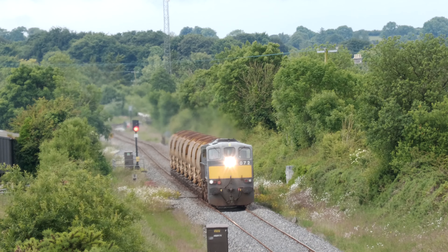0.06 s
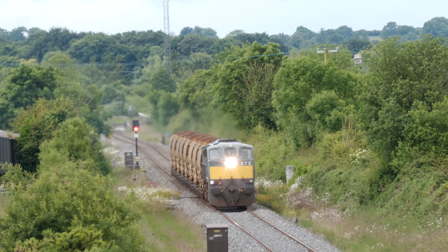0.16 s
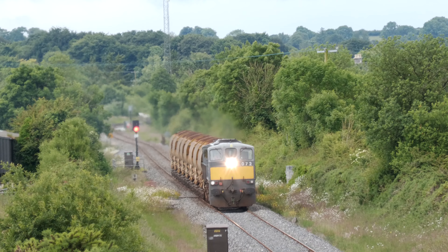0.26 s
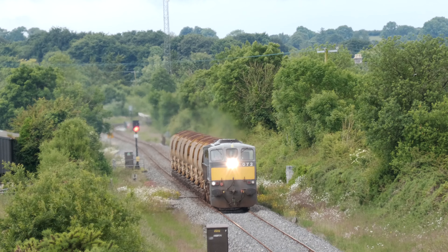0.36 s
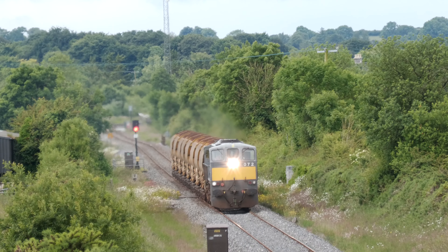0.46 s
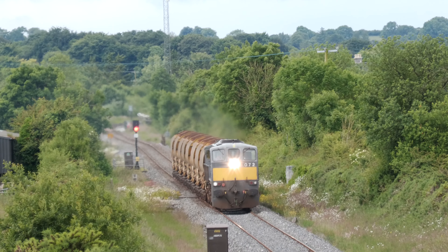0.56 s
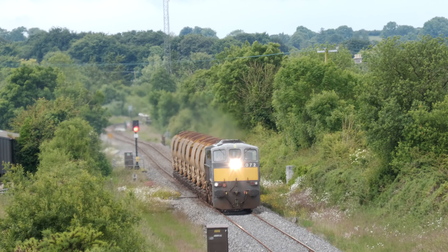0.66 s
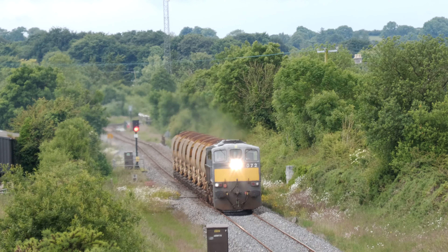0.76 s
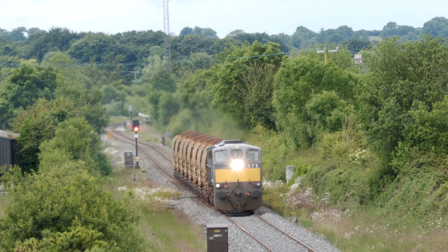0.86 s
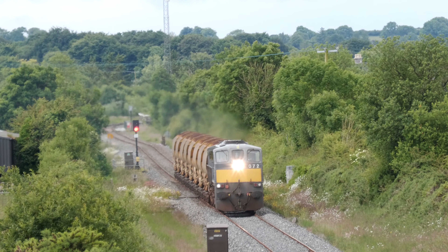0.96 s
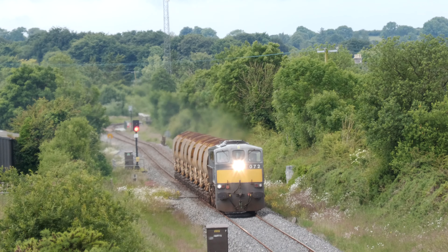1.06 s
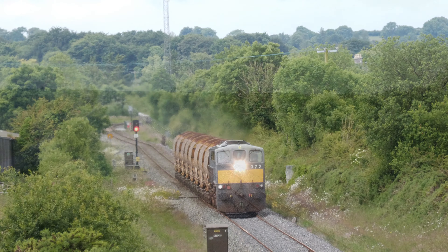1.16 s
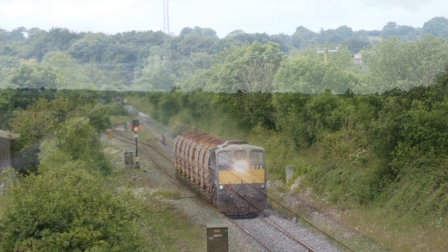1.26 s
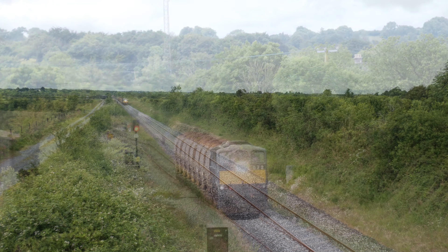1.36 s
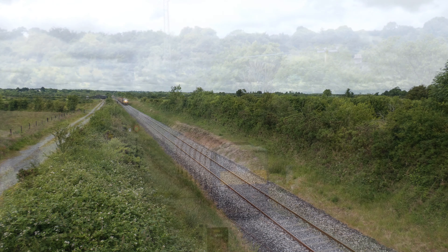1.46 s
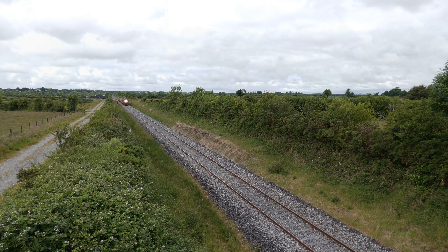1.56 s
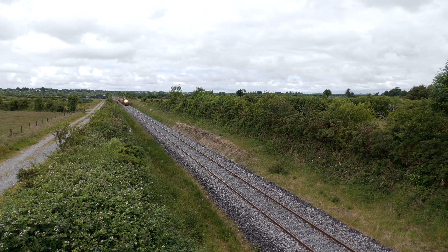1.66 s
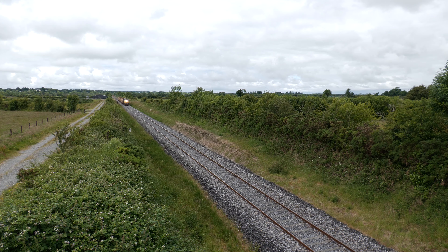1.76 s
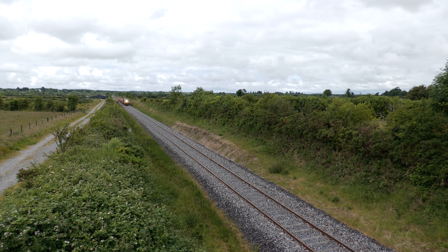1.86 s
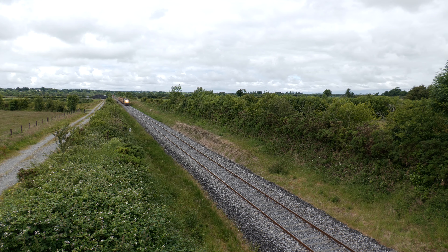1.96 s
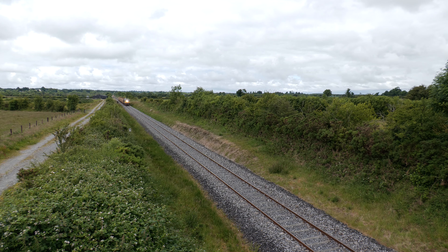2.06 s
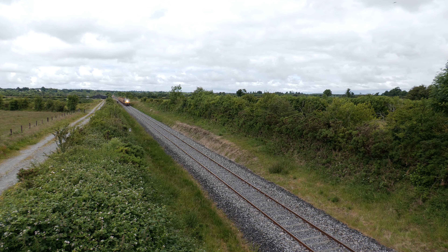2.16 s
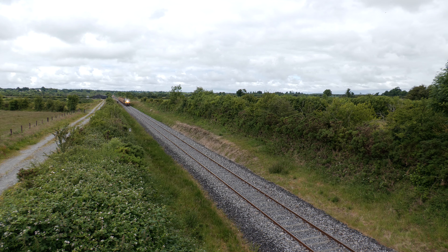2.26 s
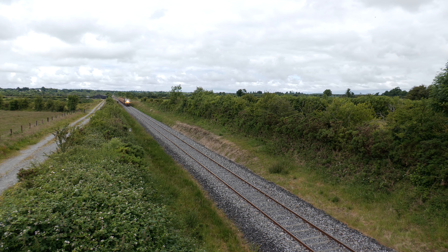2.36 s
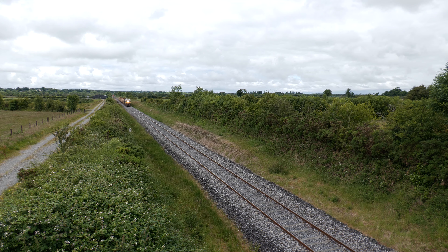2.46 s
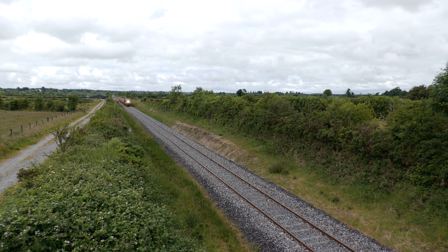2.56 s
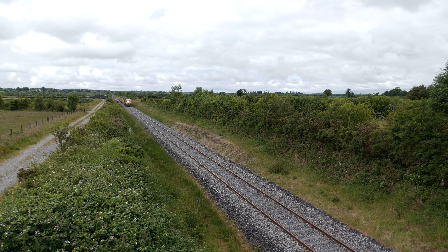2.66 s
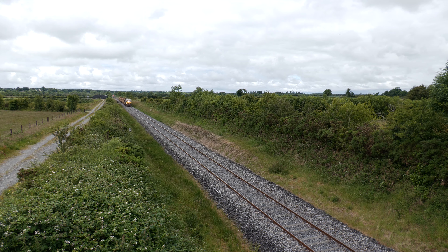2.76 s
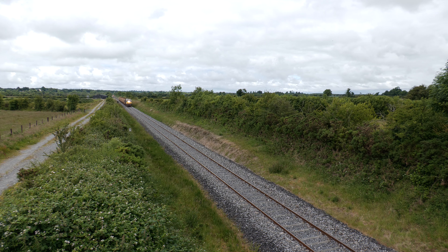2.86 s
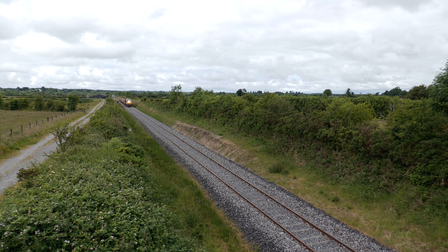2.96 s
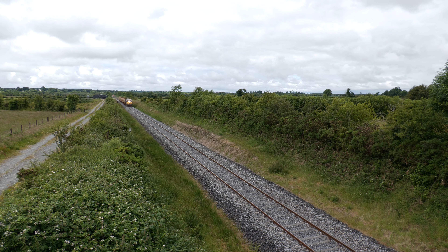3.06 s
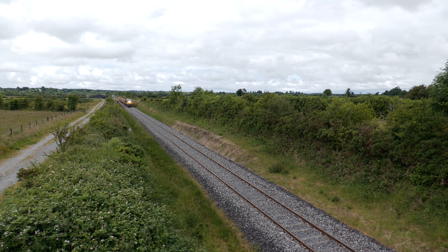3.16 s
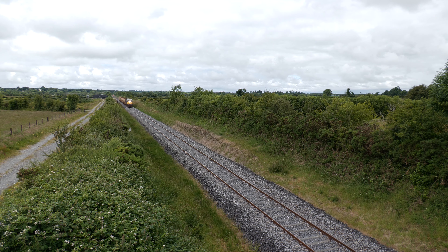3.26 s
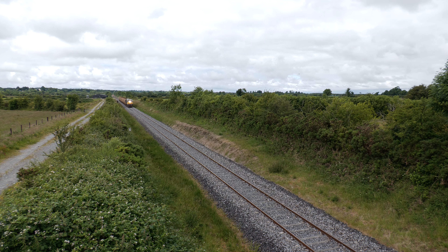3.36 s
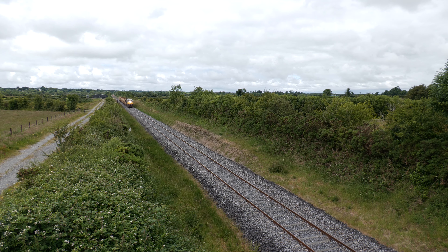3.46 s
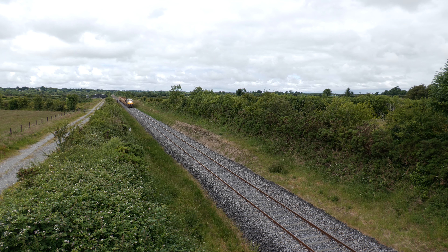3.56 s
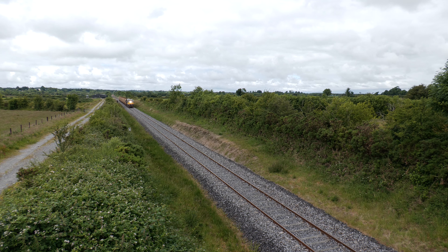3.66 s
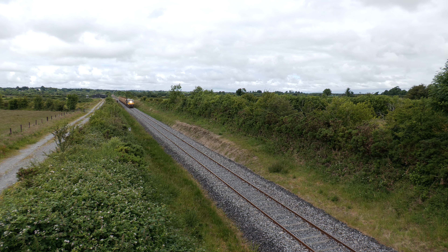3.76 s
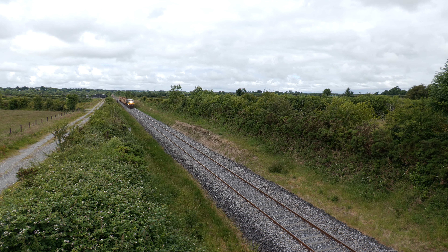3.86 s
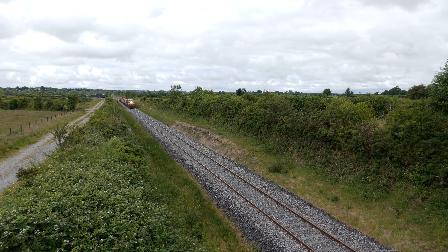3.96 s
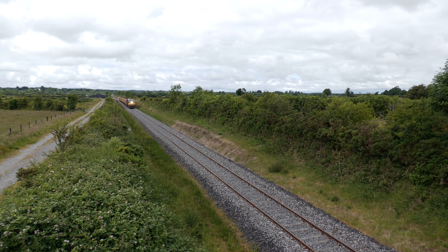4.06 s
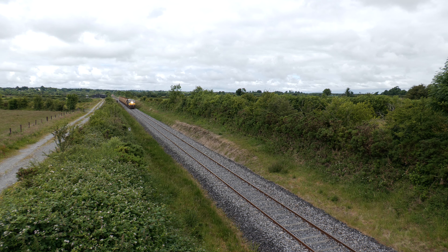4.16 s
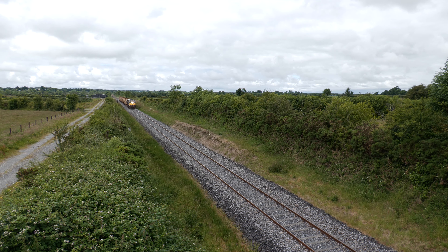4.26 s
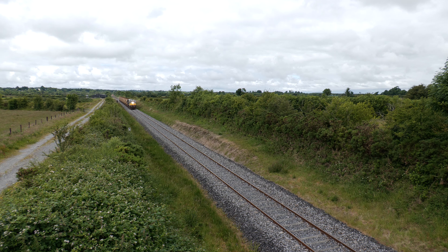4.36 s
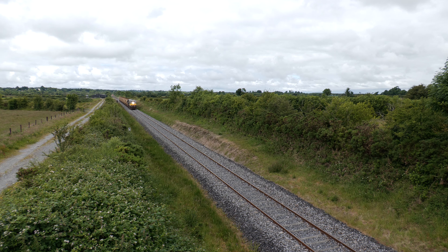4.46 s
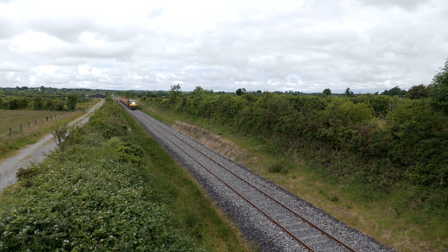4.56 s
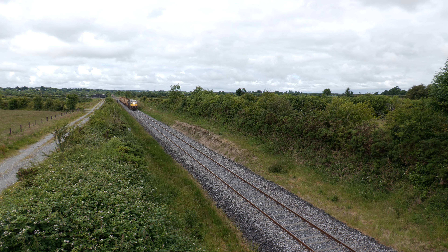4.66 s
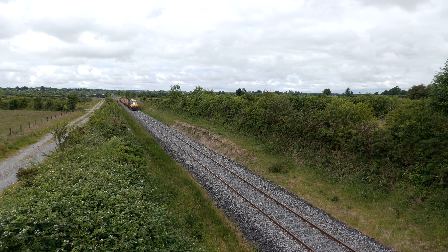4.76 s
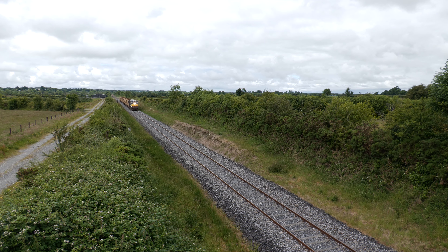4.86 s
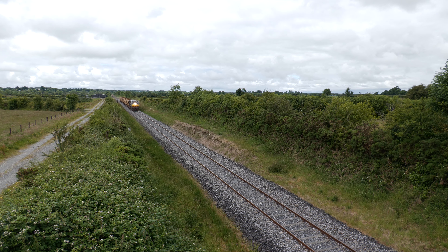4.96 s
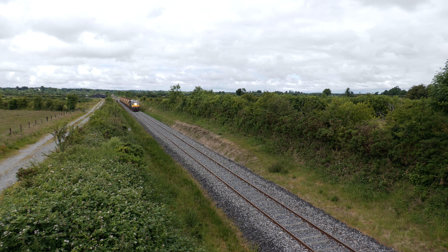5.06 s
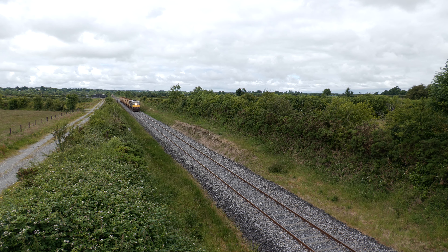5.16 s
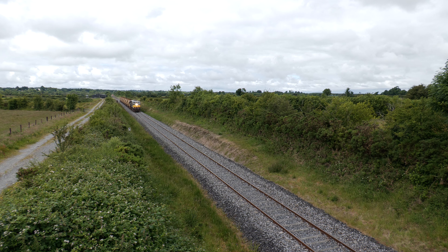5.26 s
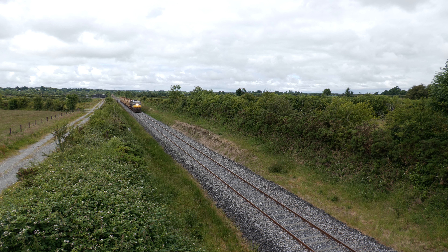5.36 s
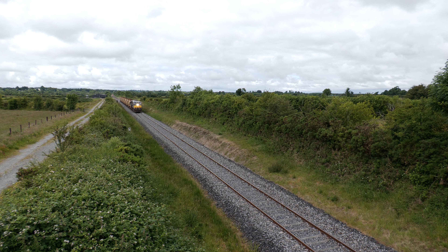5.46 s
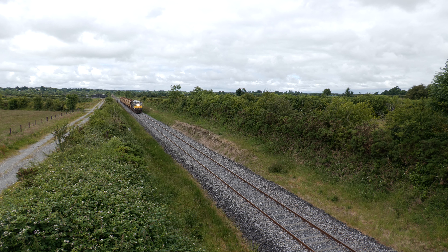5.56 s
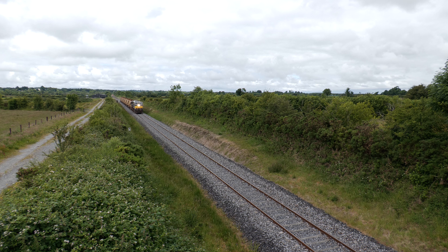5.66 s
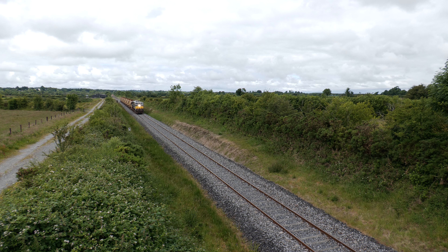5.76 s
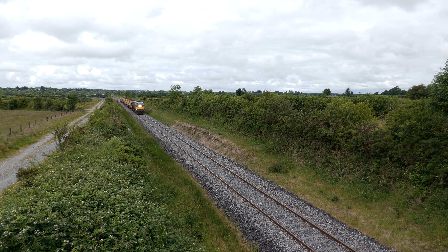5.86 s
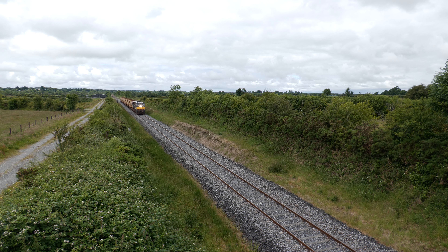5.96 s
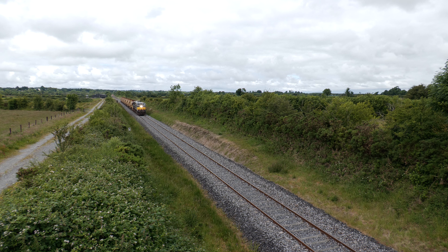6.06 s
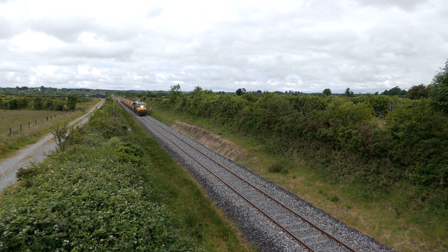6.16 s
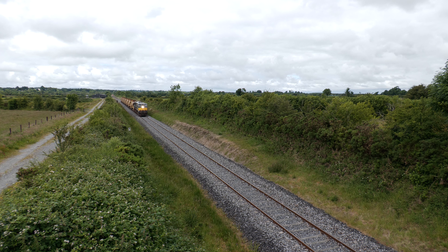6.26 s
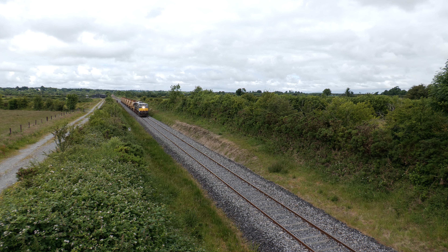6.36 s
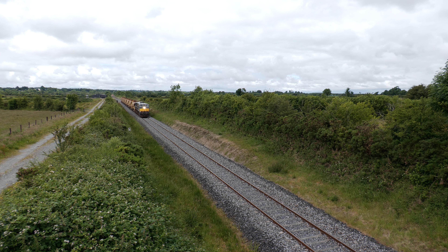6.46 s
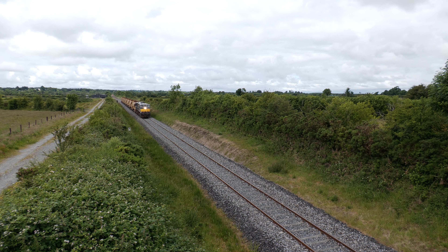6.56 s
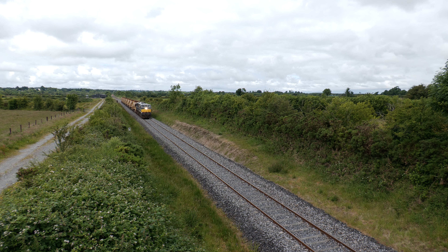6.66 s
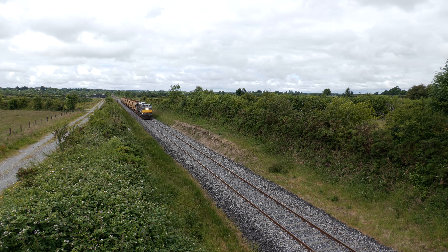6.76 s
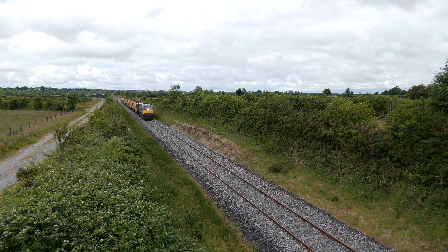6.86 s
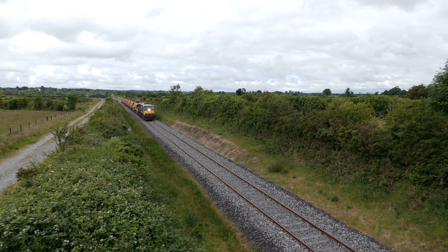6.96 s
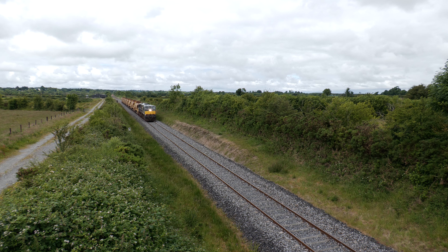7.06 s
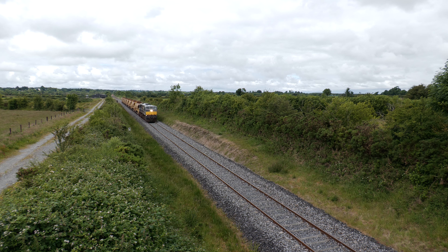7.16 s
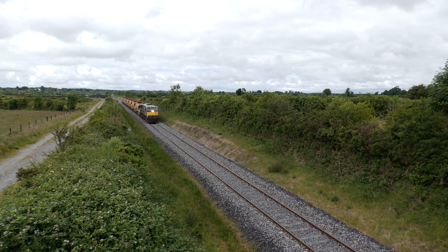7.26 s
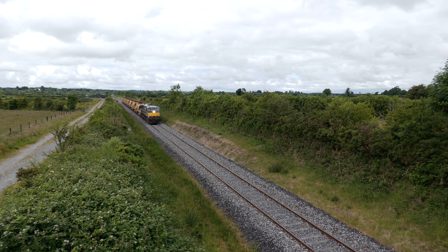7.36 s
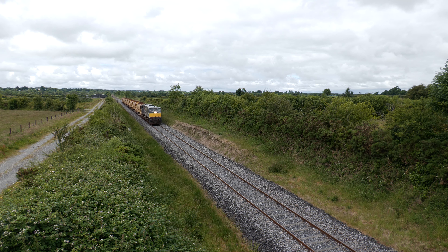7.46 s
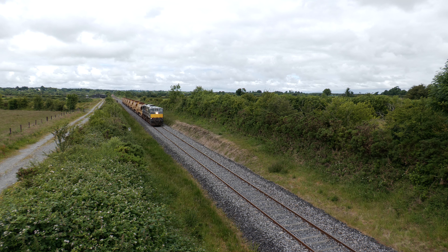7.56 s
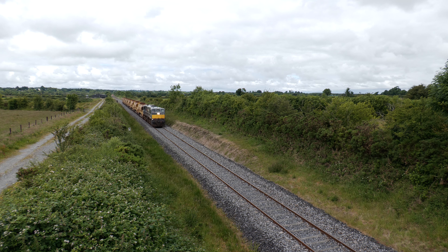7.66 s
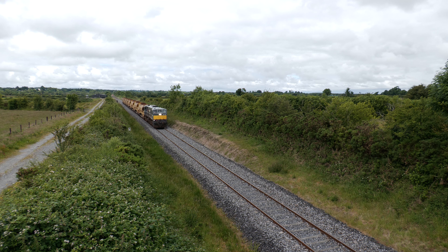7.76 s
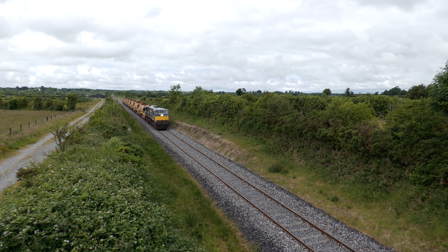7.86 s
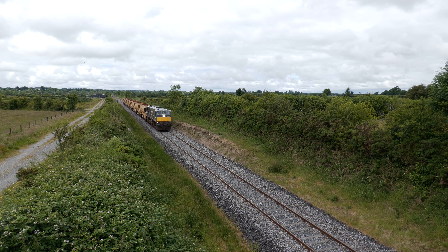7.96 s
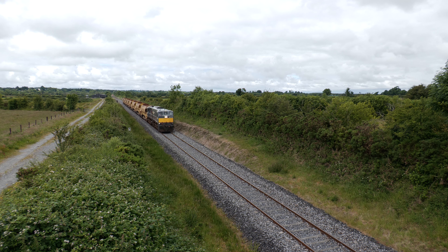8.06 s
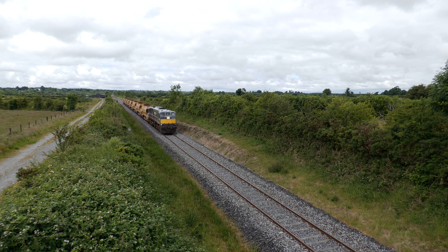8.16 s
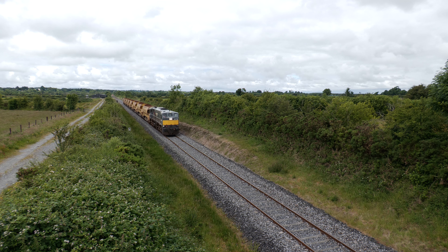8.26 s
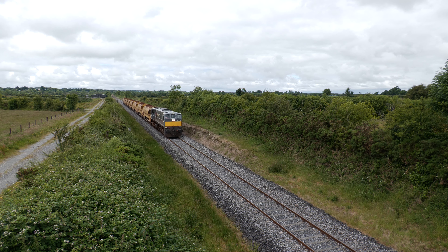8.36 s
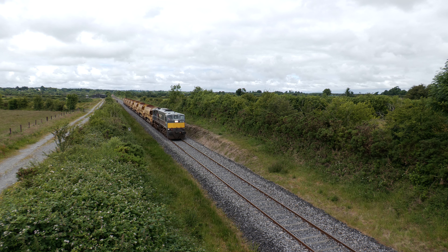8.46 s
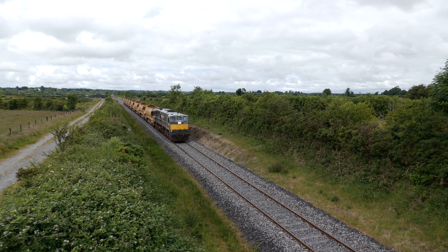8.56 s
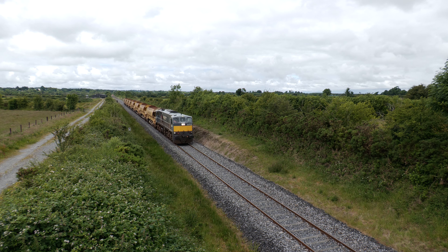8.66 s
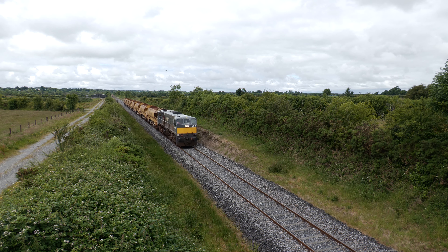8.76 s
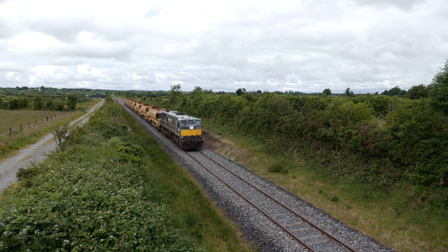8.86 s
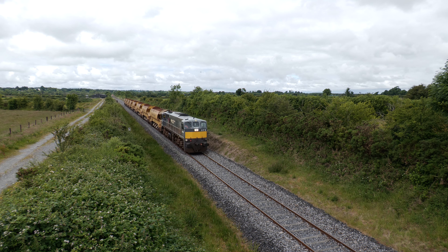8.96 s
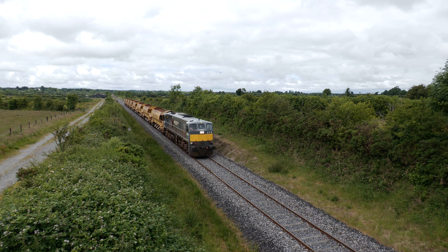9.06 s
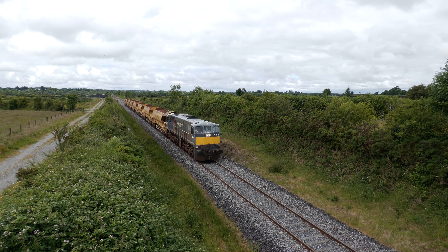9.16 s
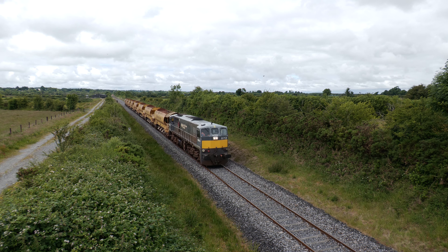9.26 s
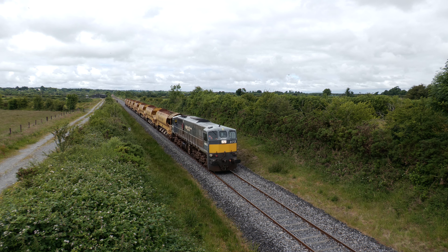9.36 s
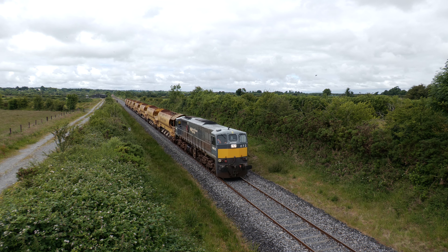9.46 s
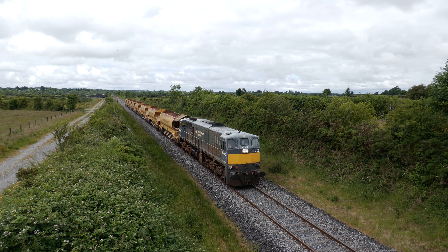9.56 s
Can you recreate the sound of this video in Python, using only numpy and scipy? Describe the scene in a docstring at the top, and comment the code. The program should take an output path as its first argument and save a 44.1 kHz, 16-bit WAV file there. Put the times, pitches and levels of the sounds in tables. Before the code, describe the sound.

A diesel freight train drones far off in open country. After about a second the sound shifts smoothly closer, and the deep, throbbing exhaust builds as the train approaches. Wheels roar, the rails ring and hiss in small surges, and a thin mechanical whine runs underneath. Later come a few faint, bright wheel scrapes. The engine is loudest at the end, nearing a fixed microphone above the track.

```python
"""Open country, microphone above the line: a two-stroke diesel freight train is heard far off, then,
after a brief crossfade, nearer and approaching. The exhaust booms once every crank turn and barks in the
higher orders; moving air makes the orders fade. Wheels roar on the rails, gears and blower whine, steel
hisses, and the ground echo cuts a notch that sinks as the train nears. A small bird ticks in the hedge;
later, flanges brush the rail."""
import sys
import numpy as np
from scipy import signal
from scipy.io import wavfile
from scipy.ndimage import uniform_filter1d

SR = 44100
rng = np.random.default_rng(int(sys.argv[2]) if len(sys.argv) > 2 else 0)


def transcribe(signal):
    """Save signal, clipped to [-1, 1], as a 16-bit WAV file at the path in sys.argv[1]."""
    frames = np.atleast_2d(signal).T
    limited = np.clip(frames, -1, 1)
    pcm = np.round(limited * 32767).astype(np.int16)
    wavfile.write(sys.argv[1], SR, pcm)


N = 423360
T = np.arange(N) / SR

# crank speed, hunting slowly under the governor: (time [s], speed [turns/s])
CRANK_SPEED = [(0.0, 16.075), (1.2, 15.947), (1.61, 16.156), (2.0, 15.93), (3.31, 16.132), (3.9, 16.341),
               (4.74, 15.912), (5.33, 15.917), (6.28, 16.337), (7.0, 15.967), (7.69, 16.099), (9.6, 15.892)]
# the boom, broad and even (0) or ringing on one deep note and throbbing (1): (time [s], resonance [0-1])
STACK_RESONANCE = [(0, 0.4), (1.3, 0.8), (2.2, 0.67), (3.6, 0), (4.1, 0.1), (5, 1), (6.6, 0.8), (8, 0.29),
                   (9.6, 1)]
# exhaust at the microphone: (time [s], boom level [dB], bark and gas base level [dB])
EXHAUST_LEVELS = [(0, -35, -44), (.8, -34, -40), (1.35, -35.8, -40.5), (1.65, -31, -35),
                  (2.4, -29.5, -34.5), (4.2, -25.3, -31.5), (5.25, -18, -33), (6.1, -19, -30),
                  (6.7, -21, -30.5), (7.9, -15, -29.5), (8.6, -15, -33), (9.6, -14.5, -33)]
# the boom: (order [per turn], relative level when broad [dB], relative level when ringing [dB])
BOOM_ORDERS = [(8, -8.0, -6), (9, 2, 2), (10, 2.5, -4.5), (11, -0.5, -12.5), (12, -3, -14.5),
               (13, -14, -22.5), (14, -26.5, -31.5)]
# thrum under the boom, drone deepest, bark on top: (order [per turn], relative level [dB])
THRUM_ORDERS = [(6, 3.5), (7, 2)]
DRONE_ORDERS = [(2, -22.5), (3, -5), (4, 7.5), (5, -19)]
BARK_ORDERS = [(15, 0.0), (16, -9.5), (17, -3.5), (18, 1), (19, -5.5), (20, -9.5), (21, -5.5), (22, -2),
               (23, -3), (24, -5), (25, -4.5), (26, -11.5), (27, -14), (28, -12), (29, -13), (30, -11.5),
               (31, -4.5), (32, -7), (33, -9.5), (34, -10.5), (35, -11.5), (36, -11.5), (37, -11),
               (38, -18)]
# gear whines locked to the crank: (order [per turn], relative level [dB])
GEAR_ORDERS = [(32, -11), (71.8, -15), (73, -16.5), (102.5, -21), (204, -29.5)]
# each layer at the microphone: (time [s], level [dB])
THRUM_LEVEL = [(0, -61), (1.2, -54), (1.7, -39.5), (3.3, -37), (6.4, -34.5), (7.6, -27.5), (8.65, -31.5),
               (9.3, -19.5), (9.6, -16.5)]  # swells as the stack comes alongside
RUMBLE_LEVEL = [(0, -47.5), (1.3, -49.5), (2.4, -38.5), (3.3, -39.5), (4.2, -37), (6.2, -34.5), (6.7, -38),
                (7.2, -32.5), (9.6, -43)]  # also sets the drone
ROAR_LEVEL = [(0, -51.5), (.45, -54), (1.2, -52), (1.6, -44.5), (3, -44.5), (3.6, -41), (4.9, -44.5),
              (5.7, -37.5), (9.6, -38.5)]  # stops growing once the train is near
APPROACH_LEVEL = [(0, -17), (1.25, -15.5), (1.6, -10.5), (3.1, -10), (4.8, -8), (5.6, -4.5), (7, -3),
                  (9.6, -1)]  # against the closest point; sets rail ring and hiss
BLOWER_LEVEL = [(0, -66), (2, -62), (3.5, -49), (5.2, -53), (5.9, -48), (6.45, -41.5), (6.95, -53),
                (7.9, -46), (9.6, -53.5)]
TRACTION_LEVEL = [(0, -72.5), (6, -55.5), (8.3, -53), (8.8, -48.5), (9.6, -47)]
# colours of the noises: (frequency [Hz], relative level [dB])
GAS_FAR_SPECTRUM = [(150, -21.5), (235, -13.5), (300, 0), (420, 1.5), (530, 3), (620, -6), (740, -10),
                    (1100, -38.5)]
GAS_NEAR_SPECTRUM = [(90, -21.5), (170, 0.5), (235, 1.5), (310, 2.5), (420, -6.5), (540, -8), (640, -20.5),
                     (1000, -40)]
RUMBLE_SPECTRUM = [(12, -40.5), (25, -23.5), (48, -2.5), (60, 2.5), (78, -10.5), (130, -9.5), (220, -26),
                   (400, -51)]
ROAR_SPECTRUM = [(300, -33), (560, -2.5), (700, 2), (950, -1), (1200, -4), (1420, -9), (1800, -25.5),
                 (3000, -58)]
RING_SPECTRUM = [(1000, -36), (1420, -6.5), (1580, 2), (1800, -1), (2400, -5.5), (2780, -11.5),
                 (3100, -8.5), (3270, -10), (3450, -15), (3800, -19.5), (4600, -24.5), (7000, -60.5)]
HISS_SPECTRUM = [(2500, -36.5), (3800, 0), (4600, 1), (6000, -5), (7100, -8), (8500, -14), (10500, -18.5),
                 (15000, -34.5)]
SIZZLE_SPECTRUM = [(10000, -30), (11500, -7.5), (12300, -4.5), (13000, 1.5), (13500, -5), (14100, -9.5),
                   (15500, -27)]
FLANGE_SPECTRUM = [(3000, -25), (4500, 2.5), (7000, 1.5), (9500, -6.5), (11000, -12), (15000, -23.5)]
# wheels surging over rough rail: (time [s], half length [s], ring lift [dB], hiss lift [dB])
ROUGH_RAIL = [(.85, .2, 3.5, -5), (1.78, 0.15, 2.5, 1.5), (2.6, .25, 1.5, 0.5), (3.4, .12, 3, 5),
              (3.66, 0.23, 3.5, 1), (4.45, 0.24, 0, 2), (4.99, .11, 2.5, 5), (5.52, .1, 1.5, -2),
              (6.08, 0.15, 3.5, 1), (7.6, 0.15, 2.5, 3), (8.076, 0.11, 3, 1), (8.6, 0.055, 3.5, -1),
              (9.375, 0.14, 4.5, 2)]
# main null of the ground echo, a peak while negative: (time [s], frequency [Hz], comb depth [dB])
GROUND_NOTCH = [(0, 910, -6), (4.5, 727, 4), (6, 597, 6), (7, 530, 7), (8, 422, 9.5), (8.7, 354, 14),
                (9.6, 261, 4)]
# the bird's ticks: (time [s], level [dB])
BIRD_TICKS = [(1.213, -65), (1.238, -64), (1.307, -68), (4.072, -59), (4.093, -63), (4.171, -57),
              (4.192, -56.5)]
# flanges touching the rail: (time [s], half length [s], scrape level [dB], sizzle level [dB])
FLANGE_BRUSHES = [(4.98, 0.1, -64.5, -91), (5.85, .08, -67, -76), (6.1, 0.15, -60, -72),
                  (8.05, .06, -75, -70), (8.269, .04, -57, -71), (8.618, .04, -62, -66),
                  (9.378, .12, -63.5, -68.5)]


def amp(db):
    """Decibels to gain."""
    return 10 ** (np.asarray(db) / 20)


def unit(x):
    """Scales to rms 1."""
    return x / np.sqrt(np.mean(abs(x) ** 2) + 1e-20)


def curves(rows):
    """Each value column of a table of (time [s], values), at every sample."""
    times, *columns = np.transpose(rows)
    return [np.interp(T, times, column) for column in columns]


def swell(at, half_length):
    """A smooth rise and fall of height 1 around a moment."""
    return np.exp(-((T - at) / half_length) ** 2)


def wander(rate_hz):
    """A slow, complex-valued random drift of rms about 1."""
    count = 1024
    hz = np.fft.fftfreq(count, T[-1] / count)
    white = rng.standard_normal(count) + 1j * rng.standard_normal(count)
    drift = np.fft.ifft(np.fft.fft(white) * np.exp(-(hz / rate_hz) ** 2))
    return np.interp(T, np.linspace(0, T[-1], count), unit(drift))


def noise(spectrum, patchy_db):
    """Noise of a given spectrum at rms 1, with drifting patches from turbulent air."""
    hz, _, frames = signal.stft(rng.standard_normal(N), SR, nperseg=2048)
    point_hz, point_db = np.transpose(spectrum)
    colour_db = np.interp(np.log(hz + 1), np.log(point_hz), point_db, right=-90)
    patches = uniform_filter1d(rng.standard_normal(frames.shape), size=18, axis=0)
    patches = unit(uniform_filter1d(patches, size=10, axis=1))
    return unit(signal.istft(frames * amp(colour_db[:, None] + patchy_db * patches), SR)[1][:N])


def orders(turns, rows, fade, fade_hz, scatter=0):
    """Crank orders meet in one suction pulse a turn; echoes scatter each one, moving air fades it."""
    total, power = np.zeros(N), 0
    for order, db in rows:
        lag = np.pi + 2 * np.arctan((order - 11.05) / 0.28)  # held back by the manifold's resonance
        paths = 1 + scatter * np.exp(2j * np.pi * rng.random()) + fade * wander(fade_hz)
        angle = 2 * np.pi * order * turns - lag
        total -= amp(db) * (paths.real * np.cos(angle) + paths.imag * np.sin(angle))
        power = power + amp(db) ** 2
    return total / np.sqrt(power * (1 + scatter ** 2 + fade ** 2) / 2)


def exhaust(turns):
    """The stack's boom throbs with the crank over a deep rumble; above come the bark and puffs of gas."""
    boom_db, bark_db = curves(EXHAUST_LEVELS)
    rumble_gain = amp(curves(RUMBLE_LEVEL)[0])
    resonance = curves(STACK_RESONANCE)[0]
    boom_orders = [(order, broad + resonance * (ringing - broad)) for order, broad, ringing in BOOM_ORDERS]
    boom = amp(boom_db) * orders(turns, boom_orders, fade=0.096, fade_hz=3.4)
    thrum = amp(curves(THRUM_LEVEL)[0]) * orders(turns + 0.556, THRUM_ORDERS, fade=0.62, fade_hz=2.7)
    drone = rumble_gain * orders(turns + 0.3, DRONE_ORDERS, fade=0.33, fade_hz=2.3)
    bark = amp(bark_db - resonance) * orders(turns, BARK_ORDERS, fade=2.09, fade_hz=1.9, scatter=0.75)
    throb = 0.28 * resonance * np.cos(2 * np.pi * (turns + 0.087))
    puffs = unit(1 + throb + 0.3 * np.cos(2 * np.pi * 12 * turns))
    depth = np.clip((T - 3.4) / 2.7, 0.03, 0.95)  # the rush of gas deepens as the train draws near
    far_rush = np.sqrt(1 - depth) * noise(GAS_FAR_SPECTRUM, patchy_db=1.0)
    near_rush = np.sqrt(depth) * noise(GAS_NEAR_SPECTRUM, patchy_db=1.0)
    gas = amp(bark_db - 3 + 2.05 * depth) * puffs * (far_rush + near_rush)
    rumble = rumble_gain * noise(RUMBLE_SPECTRUM, patchy_db=2.5)
    return boom + thrum + drone + bark + gas + rumble


def rolling(turns):
    """Wheel roar, ringing rails and hissing steel, shaken a little by the engine's clatter."""
    rattle = sum(0.042 * np.cos(2 * np.pi * (order * turns + rng.random())) for order in range(4, 8))
    clatter = unit(1 + 0.05 * np.cos(2 * np.pi * (turns + 0.3)) + rattle)
    approach_db = curves(APPROACH_LEVEL)[0]
    ring_lift_db = sum(db * swell(at, half) for at, half, db, _ in ROUGH_RAIL)
    hiss_lift_db = sum(db * swell(at, half) for at, half, _, db in ROUGH_RAIL)
    roar = amp(curves(ROAR_LEVEL)[0]) * noise(ROAR_SPECTRUM, patchy_db=1.2)
    ring = amp(-42 + approach_db + ring_lift_db) * noise(RING_SPECTRUM, patchy_db=2.1)
    hiss = amp(-58.5 + 1.23 * approach_db + hiss_lift_db) * noise(HISS_SPECTRUM, patchy_db=2.0)
    return clatter * (roar + ring + hiss)


def whine(cycles, waver, width_hz):
    """A narrow tone that wavers."""
    return unit(((1 + waver * wander(width_hz)) * np.exp(2j * np.pi * cycles)).real)


def gears_and_blower(turns, traction_hz=1258):
    """Gears and blower sing with the crank, the traction gears with the wheels at a steady pitch."""
    gear_tones = sum(amp(db) * whine(order * turns, waver=1.0, width_hz=6) for order, db in GEAR_ORDERS)
    gears = amp(curves(ROAR_LEVEL)[0] + 0.6) * gear_tones
    blower = amp(curves(BLOWER_LEVEL)[0]) * whine(53.8 * turns, waver=0.67, width_hz=5)
    traction = amp(curves(TRACTION_LEVEL)[0]) * whine(traction_hz * T, waver=0.94, width_hz=17)
    return gears + blower + traction


def ground_echo(sound, width_octaves):
    """The bounce off the ground combs the middle band; the comb sinks as the train nears the microphone."""
    hz, frame_times, frames = signal.stft(sound, SR, nperseg=4096, noverlap=3072)
    times, null_hz, depth_db = np.transpose(GROUND_NOTCH)
    ratio = (hz[:, None] + 1) / np.interp(frame_times, times, null_hz)
    comb = np.cos(3 * np.pi * ratio) * np.exp(-(np.log2(ratio) / width_octaves) ** 2)
    comb_db = np.interp(frame_times, times, depth_db) * comb / 2
    return signal.istft(frames * amp(comb_db), SR, nperseg=4096, noverlap=3072)[1][:N]


def background_hiss(level_db):
    """A faint, even hiss whose level dips briefly."""
    return amp(level_db - 3.1 * swell(1.4, 0.18)) * rng.standard_normal(N)


def bird(centre_hz, sweep_hz_per_s, half_length_s):
    """A small bird in the hedge: each tick is a whistle that sweeps up within a few milliseconds."""
    ticks = np.zeros(N)
    for at, db in BIRD_TICKS:
        span = abs(T - at) < 4 * half_length_s
        t = T[span] - at
        cycles = (centre_hz + sweep_hz_per_s * t / 2) * t
        ticks[span] += amp(db) * np.exp(-(t / half_length_s) ** 2) * np.sin(2 * np.pi * cycles)
    return ticks


def rail_sizzle(end_db, rise_db_per_s):
    """Sizzle runs along the rails ahead of the wheels, growing steadily and flaring at each flange brush."""
    ahead = amp(end_db - rise_db_per_s * (T[-1] - T))
    flares = sum(amp(db) * swell(at, half) for at, half, _, db in FLANGE_BRUSHES)
    return (ahead + flares) * noise(SIZZLE_SPECTRUM, patchy_db=0.8)


def flanges():
    """Wheel flanges brush the rail in short, bright scrapes."""
    scrapes = sum(amp(db) * swell(at, half) for at, half, db, _ in FLANGE_BRUSHES)
    return scrapes * noise(FLANGE_SPECTRUM, patchy_db=2.5)


def scene():
    """At the microphone, in mono: the train with its ground echo, the bird and a faint hiss."""
    turns = np.cumsum(curves(CRANK_SPEED)[0]) / SR - 0.584  # the offset places the first throb
    train = exhaust(turns) + rolling(turns)
    train += rail_sizzle(end_db=-63, rise_db_per_s=4.5) + flanges()
    train += gears_and_blower(turns)
    ticks = bird(centre_hz=5150, sweep_hz_per_s=200000, half_length_s=0.004)
    return (ground_echo(train, width_octaves=0.5) + background_hiss(level_db=-66) + ticks)[None]


def record(dry):
    """The recorder rounds off the loudest throbs, adds a small steady offset and limits the band."""
    ceiling, knee, offset, edge_hz = amp(-7.5), 8, 0.013, 15800
    rounded = dry / (1 + abs(dry / ceiling) ** knee) ** (1 / knee)
    lowpass = signal.firwin(511, edge_hz, window=("kaiser", 9), fs=SR)
    return signal.oaconvolve(rounded + offset, lowpass[None], "same")


dry = scene()
out = record(dry)
transcribe(out)
```